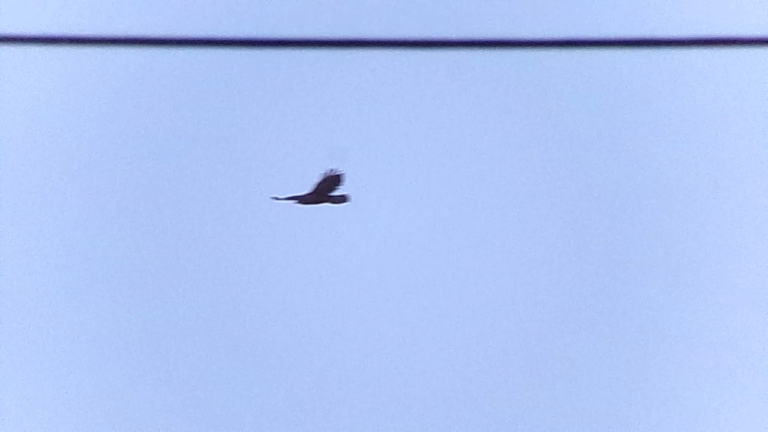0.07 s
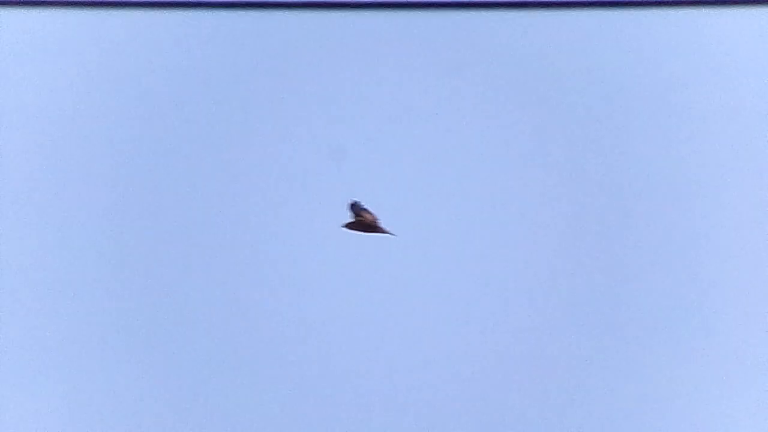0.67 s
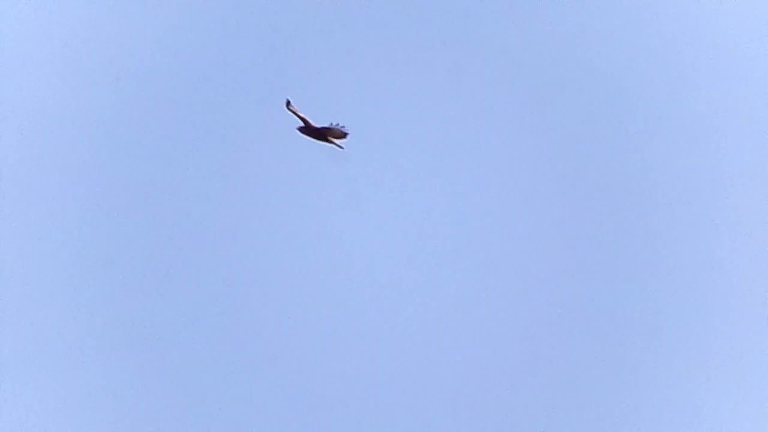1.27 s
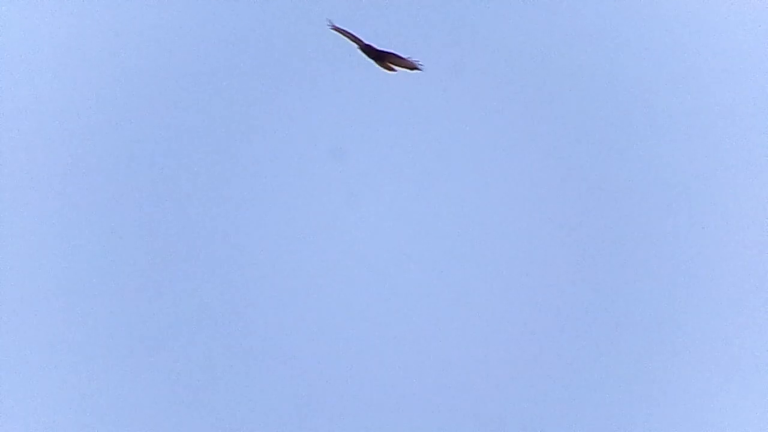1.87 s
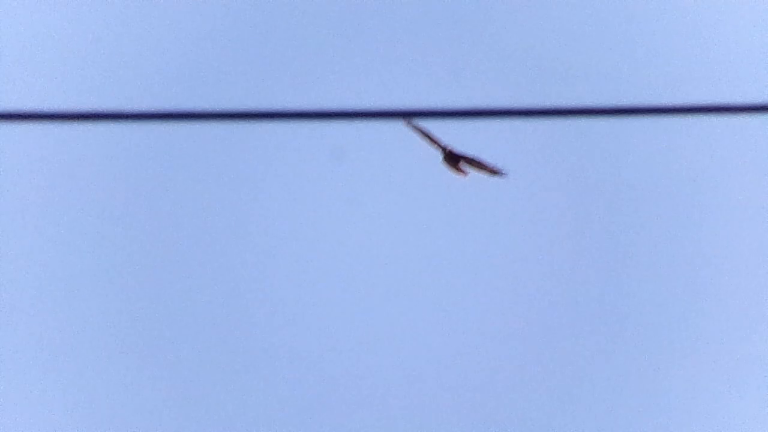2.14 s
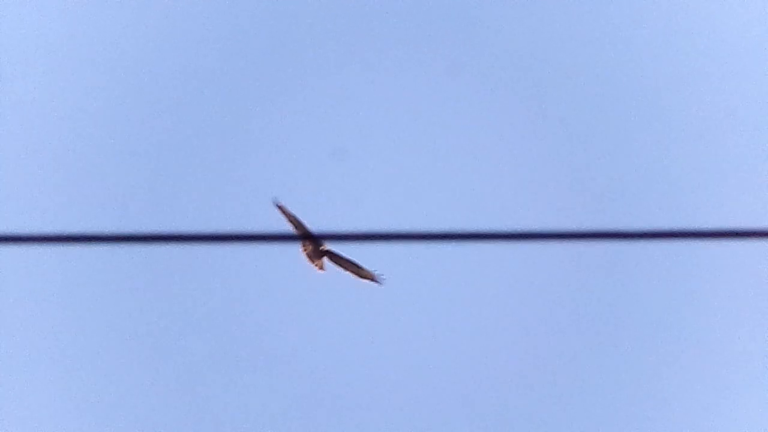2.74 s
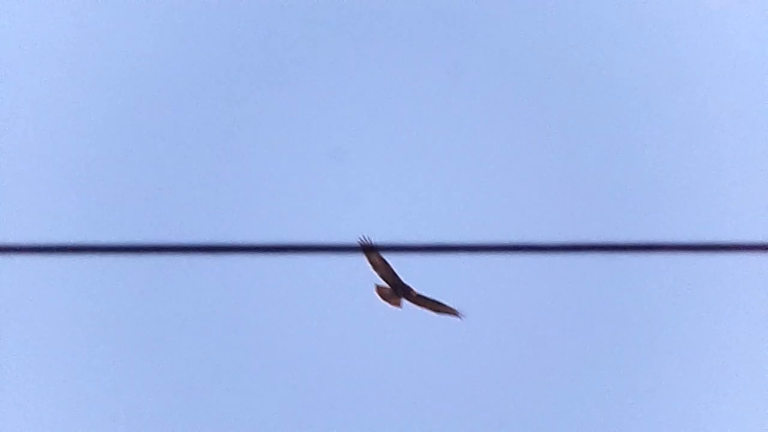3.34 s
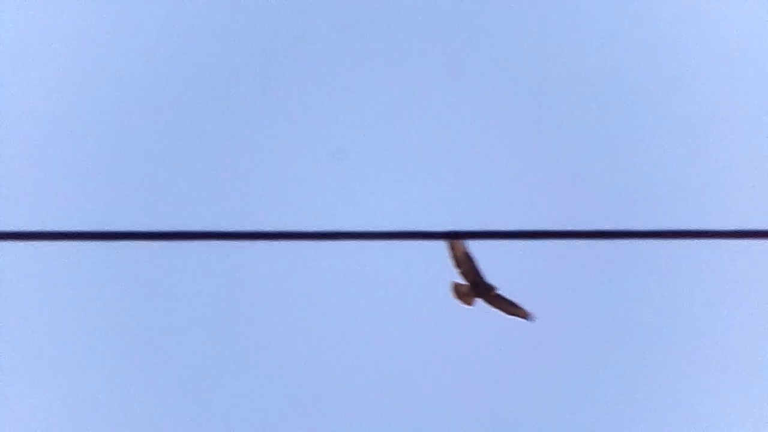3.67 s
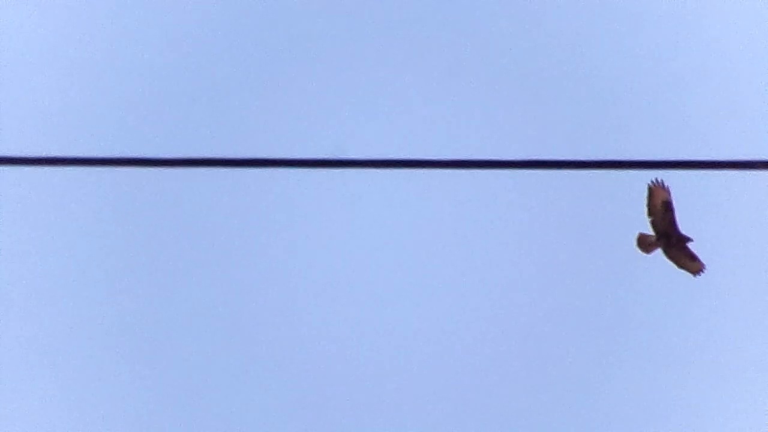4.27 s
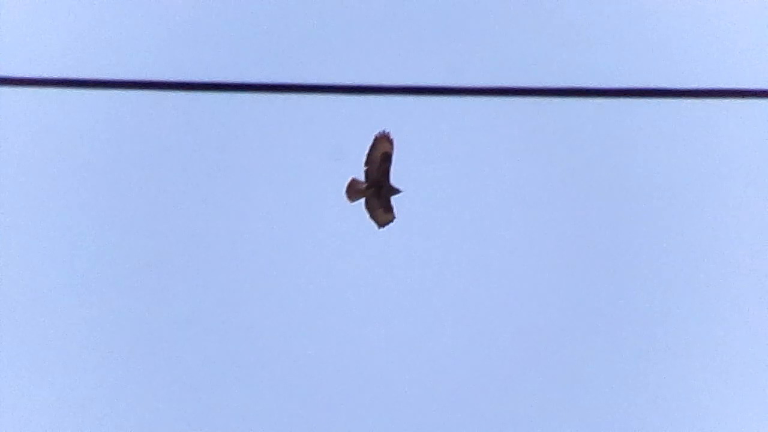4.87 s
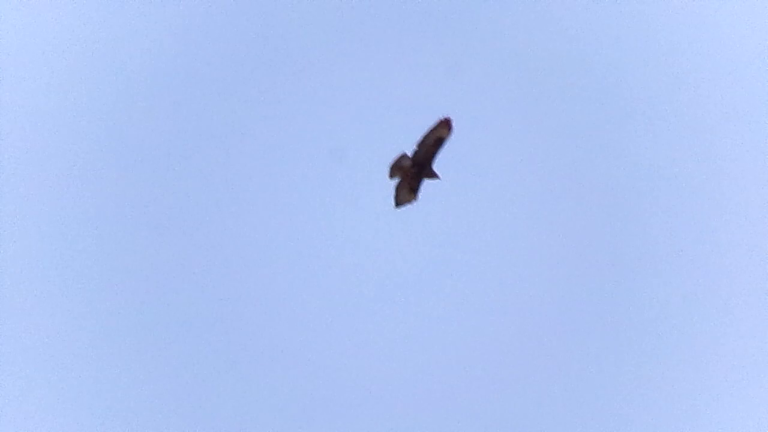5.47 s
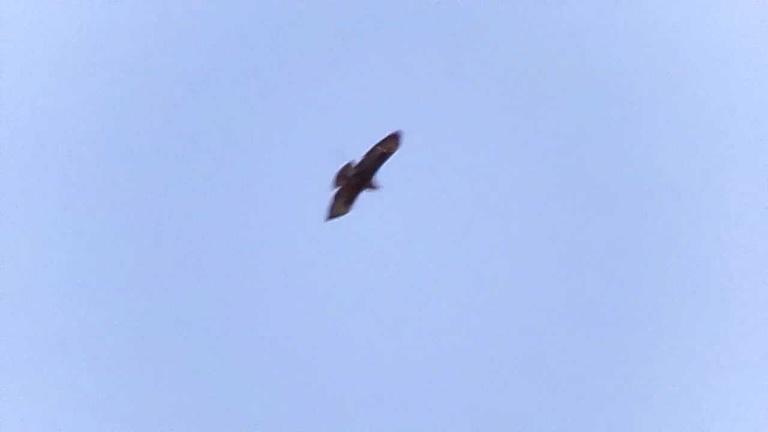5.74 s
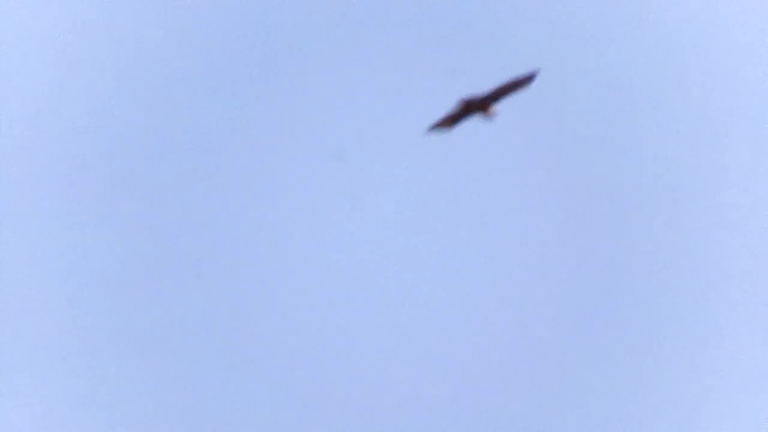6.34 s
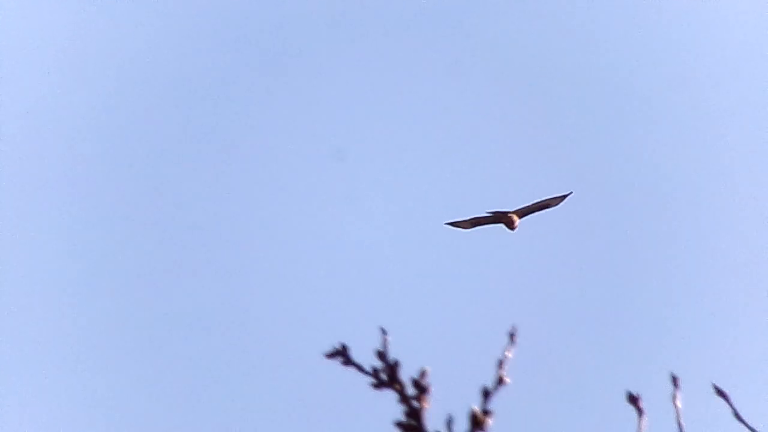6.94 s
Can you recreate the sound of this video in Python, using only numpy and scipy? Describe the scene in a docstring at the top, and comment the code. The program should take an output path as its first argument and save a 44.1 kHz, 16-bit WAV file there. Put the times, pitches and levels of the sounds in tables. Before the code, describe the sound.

A soft, steady rush of wind in far trees blends with the low rumble of distant traffic. Near the start, a camera control gives one sharp plastic click, and soon after a far vehicle briefly whines by. Faint ticks and light rubs of a hand on the casing follow in two loose clusters, close to the microphone of a camera held in the open air.

```python
"""Open air under a silent, soaring hawk, heard from a hand-held camcorder.
Turbulence in far trees makes a steady rush; distant engines and tyres rumble, and one vehicle whines by.
A control on the camera snaps once, ringing the plastic casing, which also ticks and rubs faintly
by stick-slip friction in the hand that follows the bird.
The camera fades its sound in, hisses a little and has narrow notches in the treble."""
import sys
import numpy as np
from scipy import signal
from scipy.fft import rfft, irfft
from scipy.io import wavfile

SR = 44100
rng = np.random.default_rng(int(sys.argv[2]) if len(sys.argv) > 2 else 0)


def master_out(mix):
    """Clip the mix to full scale and print it as 16-bit PCM to the path in sys.argv[1]."""
    frames = np.transpose(np.atleast_2d(mix))
    ceiling = np.clip(frames, -1, 1)
    pcm = np.round(ceiling * 32767).astype(np.int16)
    wavfile.write(sys.argv[1], SR, pcm)


N = 317520


def wind(gust_db=-48, ease_from_s=0.55, ease_db_per_s=0.0759, split_hz=1300,
         upper_db=1.9, dulling=1.73, flutter_db=0.5):
    """Turbulence in far trees radiates broadband noise; it eases and dulls a little, its top flutters."""
    # spectrum of the rush: frequency_hz, relative_db
    rush_spectrum = [(200, -25.5), (520, -13), (600, -0.5), (680, -6), (770, 0.5), (1030, 0.5),
                     (1250, -1.5), (1750, -2), (2400, -7), (3350, -10.5), (4100, -17.5), (5300, -26),
                     (5900, -31.5), (7000, -37)]
    rush = noise(rush_spectrum)
    lower = low_pass(rush, split_hz, order=1)
    easing_db = -ease_db_per_s * np.maximum(seconds() - ease_from_s, 0)
    upper = (rush - lower) * from_db(upper_db + dulling * easing_db + flutter_db * drift(4.5))
    return from_db(gust_db + easing_db) * (lower + upper)


def traffic(rumble_db=-56, waver_db=0.6):
    """Far engines and tyres add incoherently into a steady rumble with a faint narrow-band drone."""
    # spectrum of the rumble: frequency_hz, relative_db
    rumble_spectrum = [(20, -25), (38, -22.5), (46, -11), (58, 0), (74, -2.5), (105, 0.5), (135, -2),
                       (180, -3), (260, -7.5), (300, -10), (480, -15), (900, -27.5)]
    # bands of the drone: centre_hz, width_hz, level_db
    drone_bands = [(118.8, 5, -69), (179, 8.9, -81.5)]
    drone = sum(from_db(db) * rms_one(resonance(rng.standard_normal(N), hz, width_hz))
                for hz, width_hz, db in drone_bands)
    return from_db(rumble_db + waver_db * drift(3)) * noise(rumble_spectrum) + drone


def passing_vehicle(nearest_s=1.85, passing_s=0.3, peak_db=-54.5, roar_gain_db=-3):
    """Spherical spreading: the whine and roar of passing tyres fall inversely with distance."""
    def band(hz, width_hz):
        return rms_one(resonance(resonance(rng.standard_normal(N), hz, width_hz), hz, width_hz))
    whine = band(hz=1720, width_hz=380)
    roar = from_db(roar_gain_db) * band(hz=900, width_hz=600)
    distance = np.hypot(1, (seconds() - nearest_s) / passing_s)   # 1 at the closest approach
    return from_db(peak_db) / distance * (whine + roar)


def control_snap(top_hz=6300, gain_db=-4.5):
    """Impacts excite the modes of the plastic casing as a control gives, strikes its stop and bounces."""
    # contacts of the control: start_s, relative_db, edge_gain_db, t60_s
    contacts = [(0.7819, -36, -26, 0.013), (0.7845, -23.5, -23.5, 0.019), (0.788, -36, -36, .011),
                (0.7986, -35.5, -32, 0.011)]
    # modes of the casing: centre_hz, width_hz, gain_db
    modes = [(1080, 300, -6.5), (1980, 420, -2), (2830, 650, 1.5), (4100, 770, -3), (4900, 1000, -4.5),
             (5870, 330, -8)]

    def casing(x):
        ringing = sum((-1) ** k * from_db(db) * resonance(x, hz, width_hz)
                      for k, (hz, width_hz, db) in enumerate(modes))
        return low_pass(ringing, top_hz, order=8)
    out = np.zeros(N)
    for start_s, db, edge_db, t60_s in contacts:
        add_contact(out, start_s, db + gain_db, t60_s,
                    lambda x: casing(x) + from_db(edge_db) * edge_crack(x))
    return out


def casing_ticks(gain_db=-3, crack_db=-7, shell_db=6):
    """Each slip of a gripped seam excites a body resonance; sharp ones crack and ring the thin shell."""
    # slips of the seams: start_s, relative_db, body_hz, relative_edge_db, t60_s
    slips = [(.536, -61, 5500, -7, .015), (1.303, -65, 8160, -3, .015), (2.716, -47, 3640, -15, 0.022),
             (2.816, -42.5, 3500, -20, .018), (2.943, -40, 1950, -40, 0.022),
             (3.23, -46.5, 3120, -40, 0.017), (3.465, -62, 4700, -25, .02), (3.768, -44, 3220, -21, .02),
             (3.955, -52, 5300, 14, 0.012), (5.731, -46, 3520, -10, 0.015), (6.147, -47, 3380, -16, 0.021),
             (6.309, -59, 5100, -20, .02), (6.343, -46, 3250, -22, .03), (6.553, -60, 5000, -20, .02),
             (7.063, -49.5, 3330, -19, 0.018)]
    out = np.zeros(N)
    for start_s, db, body_hz, edge_db, t60_s in slips:
        def colour(x):
            body = resonance(x, body_hz, width_hz=0.12 * body_hz)
            body = low_pass(body, min(1.78 * body_hz, 9000), order=6)
            shell = low_pass(resonance(x, hz=4700, width_hz=1300), 7000, order=6)
            return body + from_db(edge_db + crack_db) * (edge_crack(x) + from_db(shell_db) * shell)
        add_contact(out, start_s, db + gain_db, t60_s, colour)
    return out


def hand_rub(attack_db_per_s=232, release_db_per_s=170, grain_db=2.0, gain_db=-0.1):
    """Stick-slip friction of skin on plastic: each stroke is a grainy whisper that swells, holds, dies."""
    # strokes of the hand: middle_s, relative_db, hold_s
    strokes = [(2.565, -60, .02), (2.744, -61, .03), (3.2, -62, .02), (3.8, -50, 0.059),
               (6.065, -56.5, 0.07), (6.376, -61.5, 0.15), (6.545, -62, .03)]
    # spectrum of the friction: frequency_hz, relative_db
    friction_spectrum = [(1500, -31), (3300, 13), (4000, 3), (5200, -1), (6500, -18), (7500, -22),
                         (9000, -23), (11000, -48)]
    t, envelope = seconds(), 0
    for middle_s, db, hold_s in strokes:
        early_s = np.maximum(middle_s - hold_s / 2 - t, 0)
        late_s = np.maximum(t - middle_s - hold_s / 2, 0)
        envelope += from_db(db + gain_db - attack_db_per_s * early_s - release_db_per_s * late_s)
    return envelope * rms_one(noise(friction_spectrum) * from_db(grain_db * drift(90)))


def edge_crack(x, hz=6900, width_hz=2600, top_hz=9100):
    """Hard plastic edges meet so briefly that they excite a broad treble band."""
    return low_pass(resonance(resonance(x, hz, width_hz), hz, width_hz), top_hz, order=10)


def add_contact(out, start_s, level_db, t60_s, colour):
    """Add an exponentially damped friction burst; level_db is its energy averaged over t60_s / 4."""
    t = np.arange(SR // 8) / SR
    burst = colour(rng.choice([-1., 1.], len(t)) * from_db(-60 * t / t60_s))
    burst *= from_db(level_db) * np.sqrt(t60_s * SR / 4 / np.sum(burst ** 2))
    start = int(start_s * SR)
    out[start:start + len(t)] += burst[:N - start]


def noise(spectrum, skirt_db_per_octave=40):
    """Spectral shaping of white noise to unit rms, rolling off beyond the ends of the spectrum."""
    points_hz, level_db = np.transpose(spectrum)
    octave, points = np.log2(np.fft.rfftfreq(N, 1 / SR) + 1e-3), np.log2(points_hz)
    octaves_outside = np.abs(octave - np.clip(octave, points[0], points[-1]))
    gain = from_db(np.interp(octave, points, level_db) - skirt_db_per_octave * octaves_outside)
    return rms_one(irfft(rfft(rng.standard_normal(N)) * gain, N))


def drift(rate_hz):
    """Random fluctuation of unit rms, mostly slower than rate_hz."""
    hz = np.fft.rfftfreq(N, 1 / SR)
    return rms_one(irfft(rfft(rng.standard_normal(N)) / (1 + (hz / rate_hz) ** 2), N))


def resonance(x, hz, width_hz):
    """A damped oscillator: two poles, unit gain at the peak."""
    radius = np.exp(-np.pi * width_hz / SR)
    feedback = [1, -2 * radius * np.cos(2 * np.pi * hz / SR), radius ** 2]
    return signal.lfilter(np.array([1, 0, -1]) * (1 - radius ** 2) / 2, feedback, x)


def low_pass(x, hz, order=2):
    """Maximally flat low-pass filter."""
    return signal.sosfilt(signal.butter(order, min(hz, .45 * SR), fs=SR, output="sos"), x)


def from_db(db):
    """Decibels to amplitude ratio."""
    return 10 ** (np.asarray(db) / 20)


def rms_one(x):
    """Scale to unit rms."""
    return x / np.sqrt(np.mean(x ** 2) + 1e-20)


def seconds():
    """The time of every sample."""
    return np.arange(N) / SR


def scene():
    """Superposition of the distant sources and the close camera body, in one channel."""
    return (traffic() + wind() + passing_vehicle() + control_snap() + casing_ticks() + hand_rub())[None]


def record(dry, hiss_db=-77.5, open_s=0.037, fade_end_s=0.47, fade_depth_db=23.5, cutoff_hz=15800):
    """The camera's signal chain: preamplifier noise, notches, a fade-in linear in dB, a band limit."""
    # spectrum of the preamplifier noise: frequency_hz, relative_db
    hiss_spectrum = [(5000, -37), (7500, -14), (8800, -6.5), (10200, -14.5), (12000, -6), (15700, 1)]
    # treble stop bands: centre_hz, width_hz
    notches = [(3650, 320), (3740, 376), (4185, 170), (4315, 345), (7970, 820)]
    x = dry + from_db(hiss_db) * noise(hiss_spectrum)
    for hz, width_hz in notches:
        x = signal.lfilter(*signal.iirnotch(hz, hz / width_hz, fs=SR), x)
    t = seconds()
    fade = (t >= open_s) * from_db(np.interp(t, [open_s, fade_end_s], [-fade_depth_db, 0]))
    return signal.sosfilt(signal.ellip(12, .1, 70, cutoff_hz, fs=SR, output="sos"), x * fade)


dry = scene()
out = record(dry)
master_out(out)
```